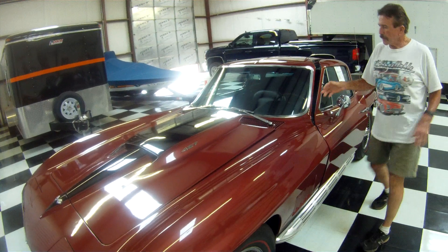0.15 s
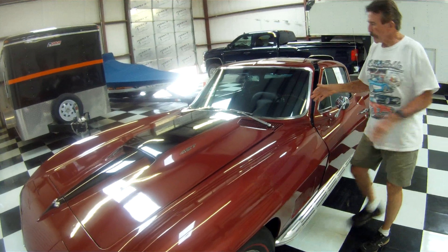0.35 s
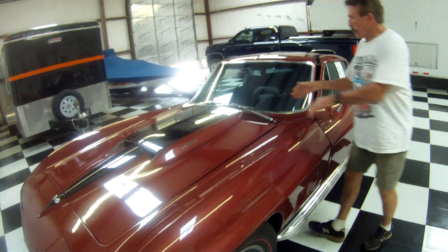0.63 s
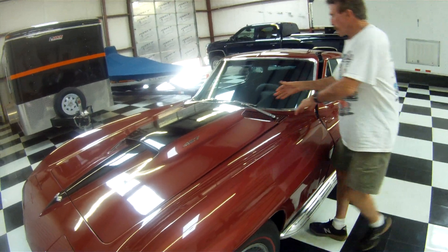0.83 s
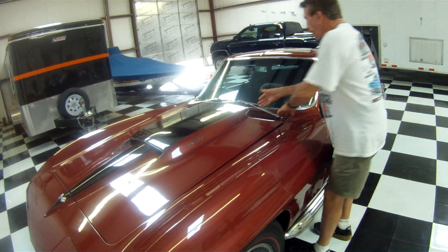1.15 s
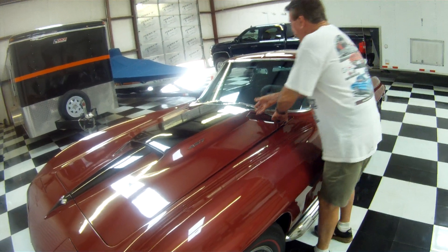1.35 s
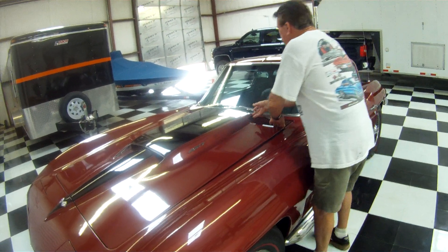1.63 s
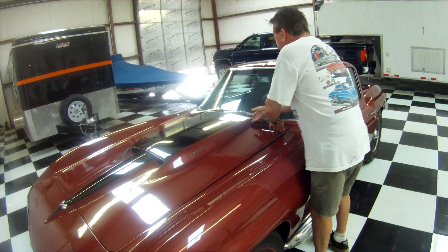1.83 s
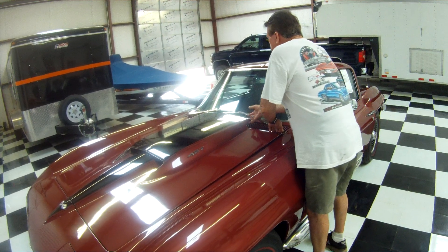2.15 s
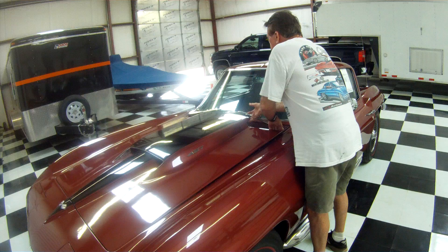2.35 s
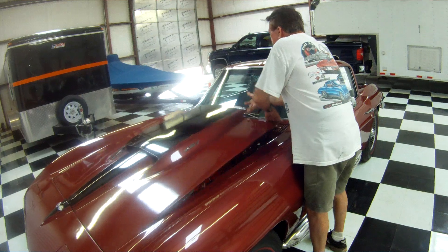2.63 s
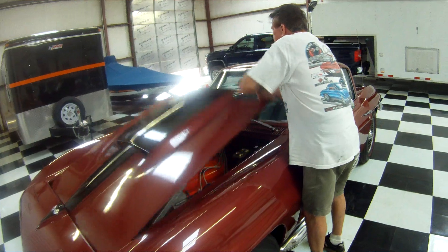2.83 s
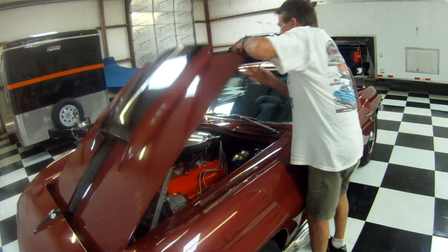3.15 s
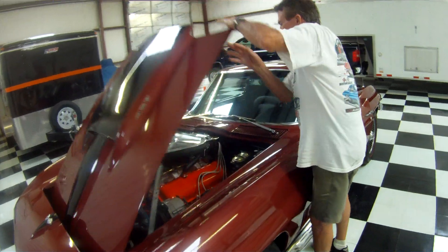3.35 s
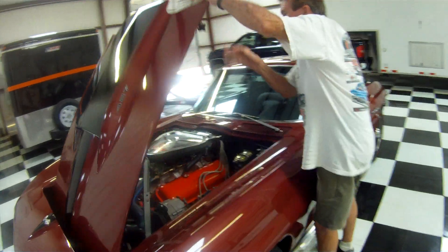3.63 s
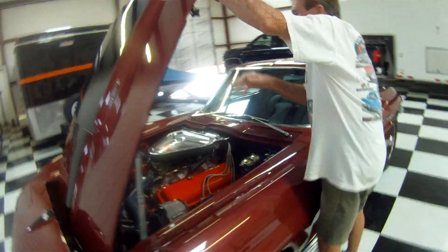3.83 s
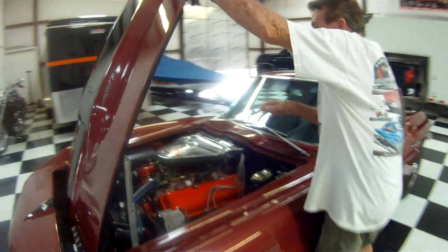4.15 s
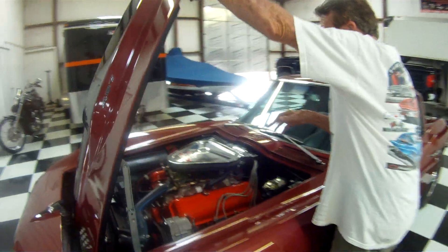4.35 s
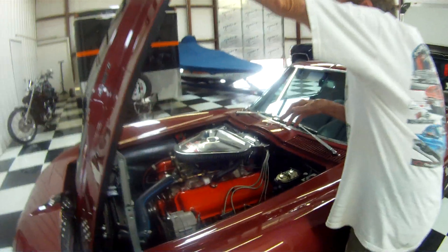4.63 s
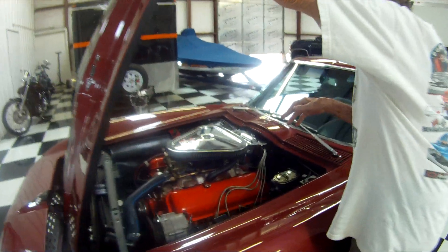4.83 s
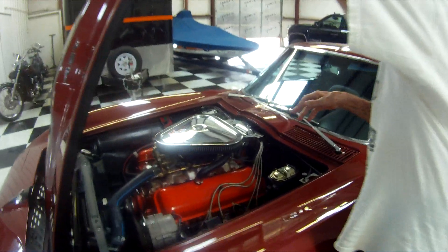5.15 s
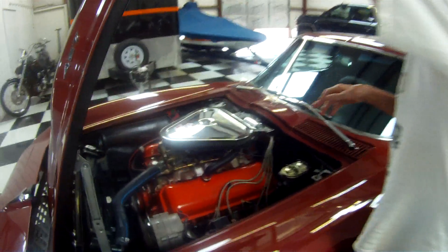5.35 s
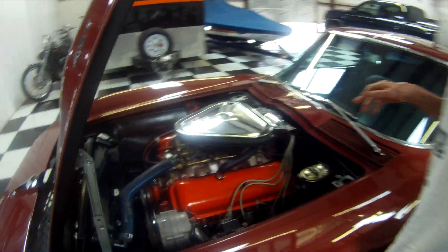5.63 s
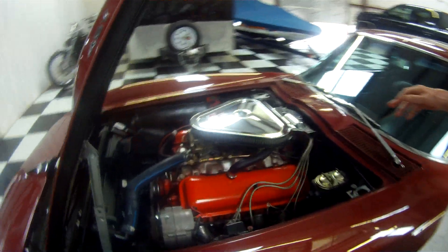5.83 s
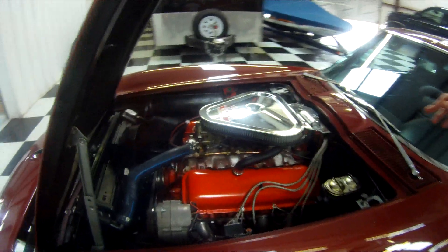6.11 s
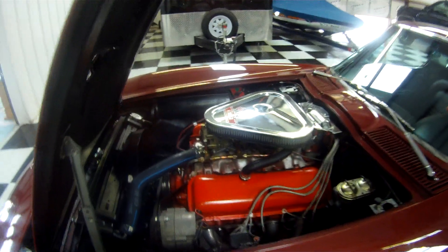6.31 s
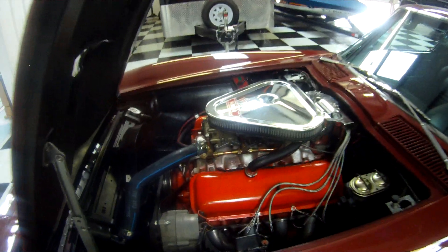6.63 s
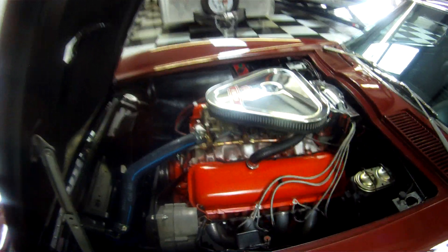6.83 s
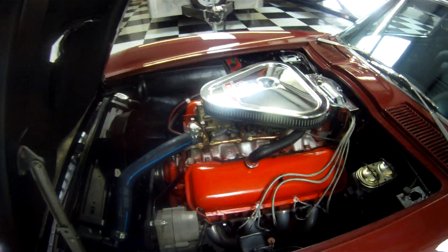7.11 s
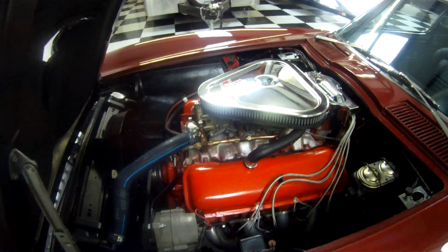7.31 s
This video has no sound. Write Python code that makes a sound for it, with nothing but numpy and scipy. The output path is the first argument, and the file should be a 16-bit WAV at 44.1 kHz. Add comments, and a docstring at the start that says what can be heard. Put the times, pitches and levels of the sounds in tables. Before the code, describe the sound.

A car hood is unlatched and lifted with light knocks in a quiet garage, followed by loud, sharp microphone bumps.

```python
"""Opening a car hood in a quiet garage

A man steps up to a car, unlatches the hood and swings it up on its rubbing hinge until the stay
(the prop that holds it) catches. Each knock rings the metal, and the hard room answers. A far motor
hum fades out at the start. The microphone is bumped twice and brushed by cloth, and its recorder's
low sampling rate mirrors the sound into the treble."""
import sys
import numpy as np
from scipy import signal
from scipy.fft import rfft, irfft, next_fast_len
from scipy.io import wavfile
from scipy.ndimage import uniform_filter1d

SR = 44100
rng = np.random.default_rng(int(sys.argv[2]) if len(sys.argv) > 2 else 0)


def int16_out(signal):
    """Quantize to a 16-bit WAV file."""
    q = np.round(np.clip(np.atleast_2d(signal).T, -1, 1) * 32767)
    wavfile.write(sys.argv[1], SR, q.astype(np.int16))


N = 329427
TIME = np.arange(N) / SR
ONE_SECOND = TIME[:SR]


# A soft footstep, then knocks on the body, hood, latch and stay. A harder hit has a higher panel_hz,
# and a heavier part has a lower thud_hz. Columns: start_s, panel_db, panel_hz, thud_hz
STEP_AND_KNOCKS = [ (1.100, -66.5, 470, 263), (1.488, -53.5, 543, 360), (1.835, -59.5, 760, 330),
                   (2.062, -56, 620, 200), (2.093, -54.5, 533, 131), (2.182, -39, 900, 145),
                   (2.218, -47.5, 620, 140), (2.375, -56, 600, 190), (2.449, -50, 880, 140),
                   (2.476, -40, 720, 100.7), (2.530, -52, 567, 135), (2.586, -63, 380, 129),
                   (3.190, -69, 350, 179), (3.230, -65.5, 340, 204), (4.357, -44.5, 840, 300),
                   (4.395, -43, 838, 320), (4.418, -67, 378, 168), (4.732, -56, 833, 200.4),
                   (5.768, -57, 580, 240), (5.792, -48.5, 709, 225)]
# The first echoes shorten as the microphone nears the engine. Columns: time_s, echo_s
ECHO_LENGTHS = [(3.3, 0.17), (4.3, 0.11)]

def step_and_knocks():
    """A soft footstep, then knocks on the car, with less echo as the microphone comes closer."""
    out = np.zeros(N)
    for start_s, panel_db, panel_hz, thud_hz in STEP_AND_KNOCKS:
        echo_s = np.interp(start_s, *np.transpose(ECHO_LENGTHS))
        add(out, start_s, knock(panel_db, panel_hz, thud_hz, echo_s))
    return out


# The tones of the hood panel, the whole shell and the steel parts when struck.
# Columns: pitch_hz, gain_db, ring_s (time to fade by 60 dB)
PANEL_TONES = [(438, 1, 0.024), (561, 4, 0.024), (675, -2.5, 0.049), (827, -3.5, 0.036), (958, -4.5, 0.043),
               (1118, 0, 0.02), (1237, -7, 0.046)]
THUD_TONES = [(70.4, 3, 0.06), (102, 4, 0.1), (125.6, 3, 0.051), (163, 4.5, 0.044), (243, -4, 0.039),
              (328, -1, 0.03), (416, -3, 0.037)]
STEEL_TONES = [(1373, 7, 0.009), (1810, -13, 0.0022), (2130, 2, 0.0026), (2516, -9, 0.036),
               (3060, 9, 0.0043), (3330, 0.5, 0.0038), (3370, 0, 0.0072), (3970, -21, 0.0012),
               (4915, 3, 0.0018)]

def knock(panel_db, panel_hz, thud_hz, echo_s):
    """A knock clinks the steel, raps the panel and, more slowly, sets the whole shell thudding."""
    thud_db = panel_db - 17 * np.log2(panel_hz / 737)  # softer hits thud more
    steel_db = panel_db - 13 - 5.5 * np.log2(thud_hz / 140)  # heavy parts shake the steel most
    panel = ring(PANEL_TONES, panel_hz, octaves=0.97)
    panel = garage_echo(panel, echo_s, rise_s=0.001, tail_db=-22.5, tail_s=1.0)
    thud = ring(THUD_TONES, thud_hz, octaves=0.73)
    thud = garage_echo(thud, echo_s, rise_s=0.0038, tail_db=-9, tail_s=0.715)
    steel = ring(STEEL_TONES, centre_hz=2500, octaves=2.3)
    steel = garage_echo(steel, echo_s, rise_s=0.00064, tail_db=-2, tail_s=0.74)
    panel = signal.sosfilt(signal.butter(2, [350, 1500], "band", fs=SR, output="sos"), panel)
    thud = signal.sosfilt(signal.butter(2, [60, 480], "band", fs=SR, output="sos"), thud)
    return at_level(panel, panel_db) + at_level(thud, thud_db) + at_level(steel, steel_db)


def ring(tones, centre_hz, octaves):
    """One blow starts several fading tones; where it lands favours those near centre_hz."""
    t = ONE_SECOND[:6000]
    out = np.zeros(len(t))
    for pitch_hz, gain_db, ring_s in tones:
        fade = amp(gain_db - 60 * t / ring_s) * hump(pitch_hz, centre_hz, octaves) ** 2
        out += fade * np.sin(2 * np.pi * (pitch_hz * t + rng.random()))
    return out


def hinge(start_s=2.68, rise_s=0.3, end_s=3.9, fastest_s=3.17):
    """Tiny slips in the hinge keep the panel murmuring as it swings; bigger ones knock it lightly."""
    slips = rng.standard_normal(N) * amp(4 * drift(49))
    murmur = unit(signal.fftconvolve(slips, ring(PANEL_TONES, centre_hz=730, octaves=1.8))[:N])
    t = TIME - start_s
    moving = np.clip(t / rise_s, 0, 1) * (TIME < end_s)
    murmur_db = -60.5 - 7.5 * np.maximum(t - rise_s, 0)  # quieter as the hood slows
    out = murmur * moving * amp(murmur_db)
    for slip_s in 2.841 + 0.142 * np.arange(6):  # six evenly spaced slips
        slip_db = -54.5 - 6.5 * abs(slip_s - fastest_s)
        add(out, slip_s, knock(slip_db, panel_hz=720, thud_hz=190, echo_s=0.19))
    brief_squeal = scuffs([(3.005, 0.12, -61.5)], pitch_hz=1090, octaves=0.061)
    return out + brief_squeal


# One faint touch and two bumps on the microphone.
# Columns: start_s, push_db, push_s, snap_db, rub_db, rub_fade_s
MICROPHONE_BUMPS = [(3.889, -33, 0.0045, -63, -68, .004), (4.0153, 2.5, .009, 6.5, -28, 0.0019),
                    (4.3043, -6.3, .0075, -28, -28.5, 0.0078)]
# The tone of rubbing on its case. Columns: pitch_hz, gain_db
CASE_TONE = [(60, -8.5), (300, 8.5), (900, -3), (2000, -13.5), (5000, -29.5)]

def microphone_bumps(rock_every_s=0.023):
    """A touch rubs the case, pushes on the microphone and snaps off, leaving it to rock twice."""
    out = np.zeros(N)
    rub = shaped_noise(CASE_TONE)
    for start_s, push_db, push_s, snap_db, rub_db, rub_fade_s in MICROPHONE_BUMPS:
        out += amp(rub_db) * rub * np.exp(-abs(TIME - start_s - push_s / 2) / rub_fade_s)
        add(out, start_s, amp(push_db) * pressure_step(push_s))
        let_go_s = start_s + push_s
        add(out, let_go_s, -amp(snap_db) * pressure_step(rise_s=0.0003, leak_s=0.0024))
        for k in range(2):
            rock = amp(snap_db - 29.5 - 7 * k) * pressure_step(rise_s=0.0037)
            add(out, let_go_s + (k + 1) * rock_every_s, rock)
    return out


def pressure_step(rise_s, leak_s=0.0032):
    """Pressure on the microphone builds with growing speed, leaks away and swings back once."""
    push = np.sin(np.pi * np.minimum(ONE_SECOND / rise_s, 1) ** 1.5) ** 2
    leak = (1 - ONE_SECOND / leak_s) * np.exp(-ONE_SECOND / leak_s)
    return signal.fftconvolve(leak, push / push.sum())[:SR]


# Clicks with no echo. Columns: start_s, peak_db, pitch_hz, fade_s
DRY_CLICKS = [(1.098, -43.5, 350, 0.00049), (2.4782, -36.5, 1890, 0.00075), (4.008, -11.5, 2920, 0.00023),
              (4.0224, -13, 480, .0008), (4.033, -17, 4600, 0.00018), (4.050, -35.5, 1470, 0.0002),
              (4.308, -22.5, 1880, 0.00093), (4.3218, -33, 2290, 0.00041), (4.3565, -48, 4830, .001),
              (4.396, -45, 4760, 0.00077), (5.092, -45.5, 2500, 0.00014), (6.274, -44.5, 1490, .0003),
              (6.6272, -33, 900, .00011)]

def clicks():
    """Tiny hard contacts each make a tone that dies almost at once."""
    out = np.zeros(N)
    for start_s, peak_db, pitch_hz, fade_s in DRY_CLICKS:
        click = np.sin(2 * np.pi * pitch_hz * ONE_SECOND) * np.exp(-ONE_SECOND / fade_s)
        add(out, start_s, amp(peak_db) * click / abs(click).max())
    return out


# Soles squeaking on tile. Columns: middle_s, length_s, level_db
SHOE_SQUEAKS = [(1.037, 0.028, -67.5), (1.110, 0.041, -61), (1.52, 0.22, -73)]

def shoe_squeaks():
    """Soles slip on the floor with a thin, high sound."""
    return scuffs(SHOE_SQUEAKS, pitch_hz=4980, octaves=0.13)


# Cloth, soles and hands brushing. Columns: middle_s, length_s, level_db
BRUSHES = [(.761, .02, -65.5), (1.04, 0.04, -64.5), (3.99, 0.17, -65), (5.794, 0.0082, -50.5),
           (6.524, 0.22, -62.5), (7.142, 0.13, -65), (7.241, 0.054, -60)]

def rustles():
    """Light brushing makes a soft noise with no clear note."""
    return scuffs(BRUSHES, pitch_hz=2500, octaves=0.73)


def scuffs(strokes, pitch_hz, octaves):
    """Each rub is a short swell of tiny slips of uneven size."""
    out = np.zeros(N)
    slips = rng.standard_normal(N) * amp(4 * drift(400))
    for middle_s, length_s, level_db in strokes:
        start_s = middle_s - length_s / 2
        stroke = slips[round(start_s * SR):][:round(length_s * SR)]
        rub = unit(shape(stroke, lambda hz: hump(hz, pitch_hz, octaves)))
        add(out, start_s, amp(level_db) * rub * signal.windows.tukey(len(rub), 0.8))
    return out


# The motor's tones, at whole multiples of its pitch. Columns: multiple, gain_db
MOTOR_TONES = [(1, 2.5), (2, -6.5), (3, -17), (4, -21.5), (5, -31), (6, -17), (7, -18), (8, -16.5),
               (9, -28), (10, -37), (11, -25)]
# Air stirred by the motor. Columns: pitch_hz, gain_db
WHIRR_TONE = [(60, 2), (180, 2.5), (400, -6), (770, 1), (1100, -9), (1800, -23), (5000, -38)]

def motor_hum(pitch_hz=95.5, peak_s=0.67, end_s=1.19, release_s=0.06):
    """A far motor hums at a nearly steady speed and dies away; the hall blurs its higher tones."""
    turns = np.cumsum(pitch_hz * (1 + 0.0065 * drift(11))) / SR
    t = TIME - peak_s
    loudness = amp(-52 + np.minimum(3 * t, -27.5 * t))  # a slight swell, then a fast fade
    loudness *= np.clip((end_s - TIME) / release_s, 0, 1)
    sound = amp(-10) * shaped_noise(WHIRR_TONE)
    for multiple, gain_db in MOTOR_TONES:
        phase = 2 * np.pi * (multiple * turns + rng.random())
        blur = 0.54 * np.log(multiple) * drift(13.6)
        flutter_db = 3 * (1 - 1 / multiple) * drift(3.8)
        sound += np.sqrt(2) * amp(gain_db + flutter_db) * np.sin(phase + blur)
    return loudness * sound


def garage_echo(sound, echo_s, rise_s, tail_db, tail_s):
    """Quick echoes off car and floor fade by 60 dB in echo_s; the hall's weaker tail takes tail_s."""
    echoes = rng.choice([-1., 1.], SR) * (rng.random(SR) < 0.25)
    build_up = 1 - np.exp(-ONE_SECOND / rise_s)
    fade = amp(-60 * ONE_SECOND / echo_s) + amp(tail_db - 60 * ONE_SECOND / tail_s)
    return signal.fftconvolve(sound, echoes * build_up * fade)[:SR]


# The garage's background noise. Columns: pitch_hz, gain_db
AIR_TONE = [(12, -43.5), (20, -13), (43, 0.5), (91, -1), (200, -9.5), (241, -9), (277, -9), (350, -11),
            (384, -14), (441, -13.5), (544, -15), (974, -17), (1380, -22), (5200, -31), (6760, -57),
            (11400, -120)]

def garage_air(level_db=-58, swell_db=1.4):
    """A low wash of noise fills the garage, gently rising and falling."""
    wash = shaped_noise(AIR_TONE)
    return amp(level_db + swell_db * drift(2.8)) * wash


def amp(db):
    """Turns decibels into a number to multiply by."""
    return 10 ** (np.asarray(db) / 20)


def unit(sound):
    """Scales a sound to an average (rms) size of 1."""
    return sound / np.sqrt(np.mean(sound ** 2) + 1e-30)


def at_level(sound, level_db):
    """Scales a sound so that its loudest 15 ms has this level."""
    power = uniform_filter1d(sound ** 2, size=660)
    return sound * amp(level_db) / np.sqrt(power.max() + 1e-30)


def gain_at(table, hz):
    """Reads the gain between the rows of a pitch_hz, gain_db table."""
    pitch_hz, gain_db = np.transpose(table)
    return amp(np.interp(np.log(hz + 1), np.log(pitch_hz + 1), gain_db))


def hump(hz, centre_hz, octaves):
    """A gain of 1 at centre_hz that falls to half this many octaves away."""
    return 1 / (1 + (np.log2((hz + 1) / centre_hz) / octaves) ** 2)


def shape(sound, gain):
    """Turns each frequency up or down by gain(hz)."""
    size = next_fast_len(sound.shape[-1])
    hz = np.fft.rfftfreq(size, 1 / SR)
    return irfft(rfft(sound, size) * gain(hz), size)[..., :sound.shape[-1]]


def shaped_noise(table):
    """Noise of size 1 with the tone of a pitch_hz, gain_db table."""
    return unit(shape(rng.standard_normal(N), lambda hz: gain_at(table, hz)))


def drift(rate_hz):
    """A smooth random wander of size 1."""
    return unit(shape(rng.standard_normal(N), lambda hz: np.exp(-(hz / rate_hz) ** 2)))


def add(mix, start_s, sound):
    """Mixes a sound in at start_s."""
    part = mix[round(start_s * SR):][:len(sound)]
    part += sound[:len(part)]


def scene(hiss_db=-69):
    """All sources reach both channels alike; each channel has a faint hiss of its own."""
    man = shoe_squeaks() + rustles()
    mono = step_and_knocks() + hinge() + microphone_bumps() + clicks() + man
    mono += motor_hum() + garage_air()
    return mono + amp(hiss_db) * rng.standard_normal((2, N))


# How strongly each pitch is mirrored into the treble. Columns: pitch_hz, gain_db
MIRROR_STRENGTH = [(100, -55), (300, -30), (900, -21.5), (2000, -16), (3500, -8), (5200, -3)]
# The recorder's high hiss. Columns: pitch_hz, gain_db
HISS_TONE = [(5800, -18), (6800, -8), (9000, -0.5), (11300, -6.5), (12000, -5), (12700, -12), (15000, -1)]

def record(dry, rate_hz=12000, dull_above_hz=5600, hiss_db=-78, top_hz=15400):
    """A low sampling rate dulls the sound and mirrors it around that rate; hiss and overload follow."""
    dull = shape(dry, lambda hz: 1 / np.sqrt(1 + (hz / dull_above_hz) ** 48))
    mirrored = shape(dull, lambda hz: gain_at(MIRROR_STRENGTH, hz))
    mirrored *= 2 * np.cos(2 * np.pi * rate_hz * TIME)
    hiss = amp(hiss_db) * shaped_noise(HISS_TONE)
    overloaded = np.clip(dull + mirrored + hiss, -1, 1)
    treble_cut = signal.firwin(511, top_hz, window=("kaiser", 9), fs=SR)
    return signal.oaconvolve(overloaded, treble_cut[None], "same")


dry = scene()
out = record(dry)
int16_out(out)
```